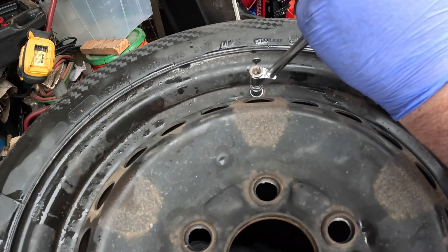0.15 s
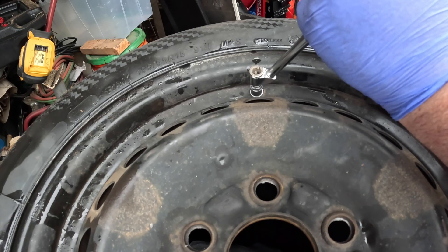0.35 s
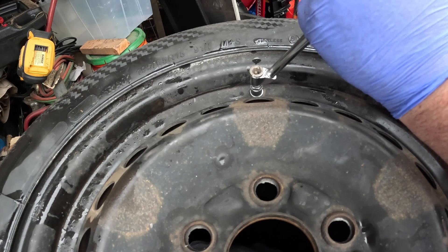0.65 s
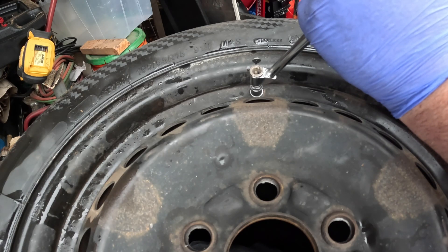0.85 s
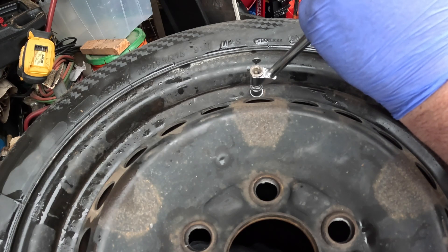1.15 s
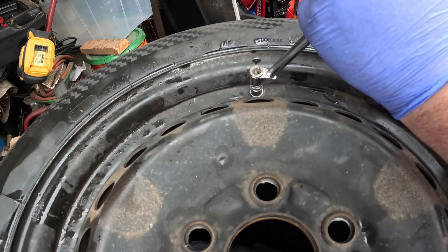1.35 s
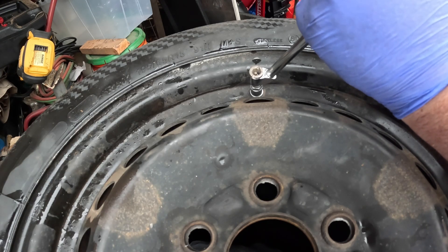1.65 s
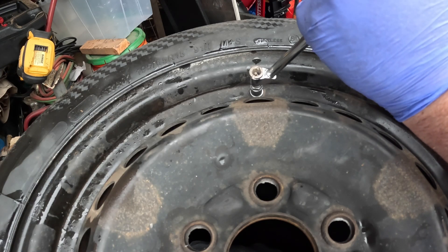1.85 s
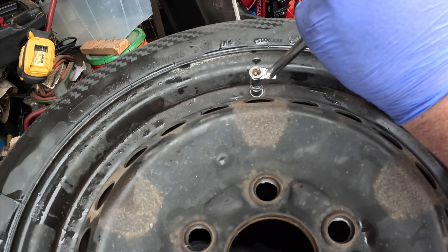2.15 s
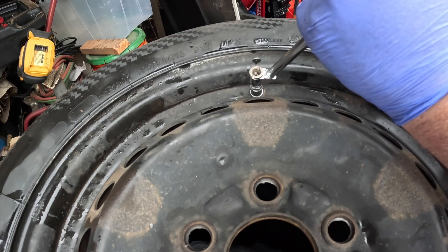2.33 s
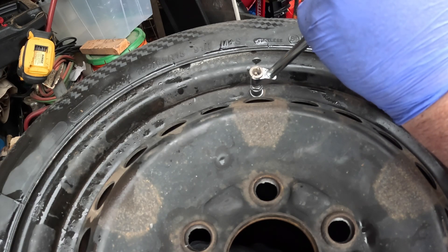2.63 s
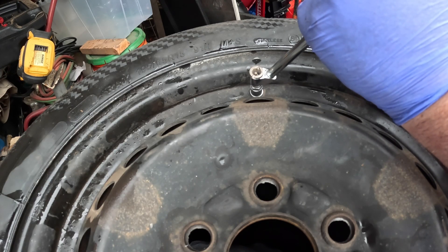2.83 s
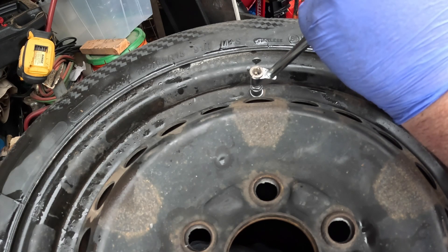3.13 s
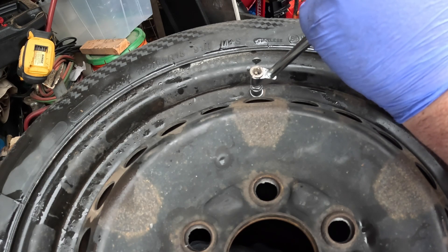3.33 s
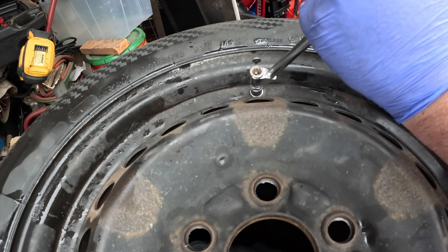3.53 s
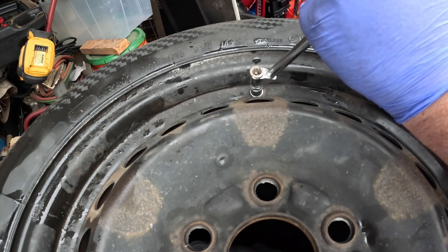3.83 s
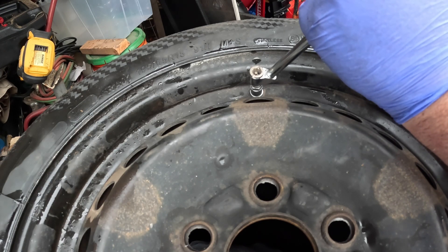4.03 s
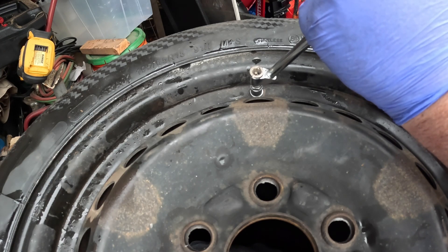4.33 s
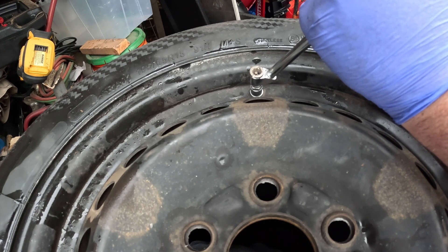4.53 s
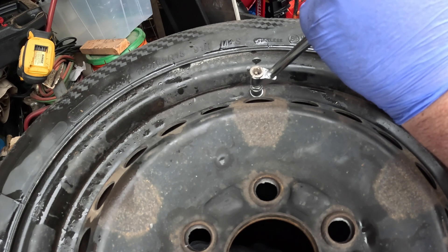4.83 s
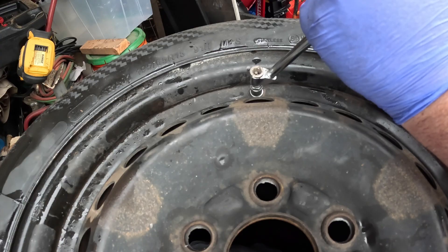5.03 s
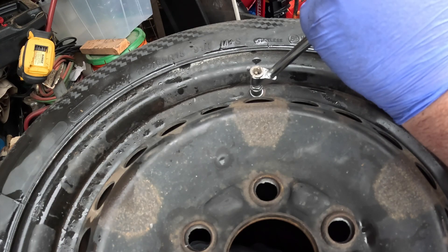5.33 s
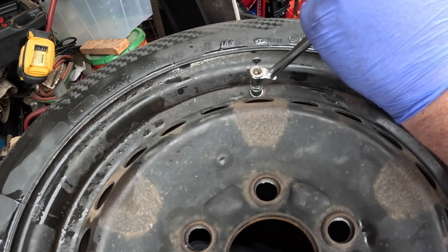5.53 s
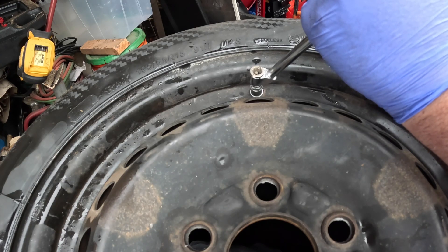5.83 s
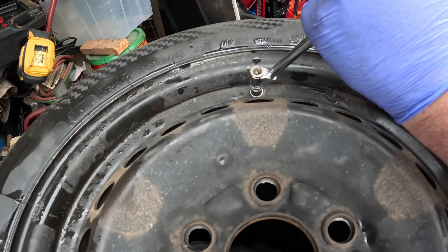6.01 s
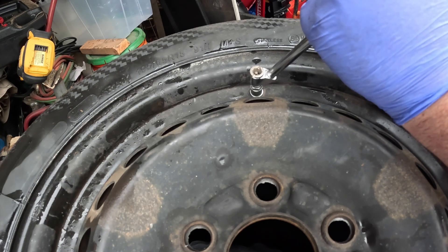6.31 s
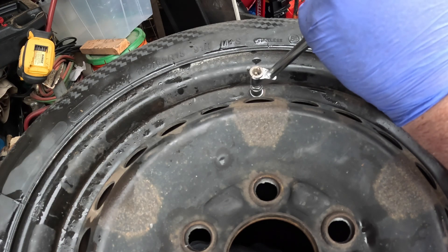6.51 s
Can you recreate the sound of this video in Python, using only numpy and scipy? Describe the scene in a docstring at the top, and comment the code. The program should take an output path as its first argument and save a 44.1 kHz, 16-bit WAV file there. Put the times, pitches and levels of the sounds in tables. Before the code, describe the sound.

Close by, an air chuck hisses into a car tire, then lets go with a tick. It is pressed on three more times, each with a sharp spit of air, a dull thump from the wheel and a short, ringing hiss. Small clicks, squeaks and thin whistles come in between. A last press slips straight off, leaving a fading whistle over the low rumble of a workshop.

```python
"""In a rumbling workshop, an air chuck (the hose's nozzle) is already hissing air into a car tyre.
After half a second it lets go with a tick; a little air seeps out and a thin leak whistles.
At about 1, 3 and 5 s it is pressed on again: air spits past the seal, the wheel thumps, and the flow
hisses through chuck and valve stem. Now and then the chuck ticks and leaks squeak or whistle.
At 6 s a last press slips straight off, leaving a fading whistle, a few faint leaks and the rumble."""
import sys
import numpy as np
from scipy import signal
from scipy.fft import rfft, irfft, next_fast_len
from scipy.io import wavfile

SR = 44100
rng = np.random.default_rng(int(sys.argv[2]) if len(sys.argv) > 2 else 0)


def generate_wav(signal):
    """Clip the signal to [-1, 1] and save it as 16-bit WAV at the path in sys.argv[1]."""
    frames = np.transpose(np.atleast_2d(signal))
    scaled = np.clip(frames, -1, 1) * 32767
    pcm = np.round(scaled).astype(np.int16)
    wavfile.write(sys.argv[1], SR, pcm)


N = 294147
SIZE = next_fast_len(N + SR // 10)
TIME = np.arange(N) / SR
FREQ = np.maximum(np.arange(SIZE // 2 + 1) * SR / SIZE, 1)


def undb(db):
    """Turns decibels into a number to multiply by."""
    return 10 ** (np.asarray(db) / 20)


def colour(points):
    """Gain at each frequency, joining up (Hz, dB) points."""
    hz, db = np.transpose(points)
    return undb(np.interp(np.log(FREQ), np.log(hz), db))


def resonance(hz, width):
    """Steep peak: gain 1 at the centre, half power at the edges."""
    return 1 / (1 + (np.sqrt(2) - 1) * (2 * (FREQ - hz) / width) ** 2)


def filtered(x, gain):
    """Sound passed through a gain at each frequency."""
    return irfft(rfft(x, SIZE) * gain, SIZE)[:N]


def noise(gain):
    """Noise of strength 1, shaped by a gain at each frequency."""
    x = irfft(gain * rng.standard_normal(2 * len(FREQ)).view(complex), SIZE)[:N]
    return x / x.std()


def wander(rate):
    """Random drift of typical size 1, up to about `rate` wiggles a second."""
    slow = FREQ[:len(FREQ) // 8]
    x = irfft(rng.standard_normal(2 * len(slow)).view(complex) / (1 + (slow / rate) ** 4))
    return np.interp(TIME, np.linspace(0, SIZE / SR, len(x)), x / x.std())


def hoarse(hz, width):
    """Narrow noise of strength 1 around a moving pitch."""
    strength = np.sqrt(2) * wander(width / 2)
    return strength * np.sin(2 * np.pi * np.cumsum(hz) / SR + np.pi * wander(width / 10))


def held(start, length, rise, fall):
    """Loudness curve that swells to 1, holds and dies away; times in seconds."""
    out = np.zeros(N)
    span = slice(*np.searchsorted(TIME, [start - 10 * rise, start + length + 20 * fall]))
    t = TIME[span] - start
    out[span] = np.exp(-(np.minimum(t, 0) / rise) ** 2 - np.maximum(t - length, 0) / fall)
    return out


def puff(at, rise, fall):
    """Loudness curve that swells to 1 and dies away at once."""
    return held(at, 0, rise, fall)


# tone of the room's noise: (frequency [Hz], level [dB])
ROOM_TONE = [(12, -55.5), (20, -18), (62, -0.5), (98, -2), (140, 0.5), (242, -3), (286, -1.5), (481, -13.5),
             (745, -13), (928, -19), (2110, -30.5), (5360, -51), (9030, -69.5), (12200, -61),
             (14000, -71.5)]
# low hums in the room: (pitch [Hz], width [Hz], level [dB])
DRONES = [(71, 9.9, -61), (164, 50, -60.5)]
# how the room swells and sinks: (time [s], rumble boost [dB], hiss boost [dB])
ROOM_SWELLS = [(0, -0.5, 15), (.8, 1.5, 1.5), (1.798, -0.7, 8.5), (3.1, 1.6, 2), (3.8, -0.5, 9),
               (4.45, 2, 5.5), (5.3, 1.5, 8.5), (5.8, 0.7, 7.5), (6.67, 0.7, 6)]

def workshop(level_db=-50, split_hz=1200):
    """The room rumbles, with two wavering hums and a faint hiss on top."""
    times, rumble_db, hiss_db = np.transpose(ROOM_SWELLS)
    air = undb(level_db) * noise(colour(ROOM_TONE))
    rumble = filtered(air, 1 / (1 + (FREQ / split_hz) ** 4))
    hiss = air - rumble
    drones = sum(noise(resonance(hz, width)) * undb(db - 0.5 * wander(1.2)) for hz, width, db in DRONES)
    low = (rumble + drones) * undb(np.interp(TIME, times, rumble_db) + wander(8))
    return low + hiss * undb(np.interp(TIME, times, hiss_db))


# spells with the valve open: (opens [s], starts to close [s], level [dB], level change [dB/s],
# brightness [dB], boost of the hollow low note [dB])
FILLS = [(-0.1, 0.484, -39, 2, -4.5, -1), (1.091, 2.413, -38, 0.5, -4.5, -2),
         (3.041, 4.193, -38.5, -0.24, -6, -2.5), (4.911, 5.373, -39, 2, -5.5, -0.5),
         (6.053, 6.134, -42.5, 14, -13.5, -6.5)]
# notes that ring inside chuck and stem: (pitch [Hz], width [Hz], level [dB])
AIR_PATH_NOTES = [(1038.5, 34, -1), (1064, 11.4, -0.06), (2120, 120, -10), (2608, 140, -6), (2785, 220, -9),
                  (3100, 31, -8), (3620, 340, -11.5), (4190, 150, -6), (4781, 110, -0.5), (5350, 77, -10.5),
                  (6476, 50, -4), (6900, 150, -13), (7060, 370, -6.5), (7476, 92, -2), (8090, 130, -11.5),
                  (8680, 100, -11), (9500, 120, -13.5), (10500, 190, -26.5), (12250, 120, -4.5)]
# broad hiss of the air jet under those notes: (frequency [Hz], level [dB])
JET_TONE = [(300, -39.5), (700, -31.5), (1500, -19.5), (1850, -22), (3300, -23), (4600, -14.5), (5900, -14),
            (7600, -12.5), (8800, -19.5), (9600, -13.5), (11200, -11), (12600, -9), (13600, -25.5),
            (14300, -63.5), (15200, -49)]

def filling(flutter_db=0.75, wander_db=0.4):
    """Swirling air hisses and makes chuck and stem ring while the valve is open."""
    flow, bright_db, hollow_db = 0, np.zeros(N), np.zeros(N)
    for opens, closes, db, db_per_s, tilt_db, boost_db in FILLS:
        open_s = np.clip(TIME - opens, 0, closes - opens)
        flow += held(opens, closes - opens, rise=0.013, fall=0.022) * undb(db + db_per_s * open_s)
        # the chuck sits differently each time
        bright_db[TIME > opens], hollow_db[TIME > opens] = tilt_db, boost_db
    ring_power = sum((undb(db) * resonance(hz, width)) ** 2 for hz, width, db in AIR_PATH_NOTES)
    gain = np.sqrt(colour(JET_TONE) ** 2 + ring_power)
    gain *= undb(-14 * resonance(8940, 170))  # a narrow dip in the hiss near 9 kHz
    # the hand is never still, so each of five bands wanders by itself
    band_of = np.searchsorted([1300, 3300, 5800, 8800], FREQ)
    air = 0
    for k, height in enumerate(np.linspace(-.5, .5, 5)):
        band = gain * (band_of == k)
        share = np.linalg.norm(band) / np.linalg.norm(gain)
        seating_db = height * bright_db + (k == 0) * hollow_db
        air += share * noise(band) * undb(seating_db + wander_db * wander(6.6))
    return flow * air * undb(flutter_db * wander(50))


# the chuck knocks on the stem: (time [s], level [dB], fade [s])
TICKS = [(0.52, -40, 0.0037), (0.531, -47, .003), (2.459, -49, 0.0043), (4.831, -58, .002),
         (5.402, -37, 0.0023), (5.99, -41, 0.002), (6.449, -63, .003)]
# tone of a tick: (frequency [Hz], level [dB])
TICK_TONE = [(500, -8), (1400, -4), (2500, 1.5), (3300, -5.5), (4300, -2), (6000, -14.5), (9000, -49),
             (14000, -52)]

def ticks(rise_s=0.00094):
    """Metal held in a hand gives short, dead clicks."""
    return noise(colour(TICK_TONE)) * sum(undb(db) * puff(at, rise_s, fade) for at, db, fade in TICKS)


# faint hisses in the pauses: (loudest at [s], swell and fade [s], level [dB])
SEEPS = [(0.921, 0.14, -84), (2.808, 0.1, -77.5)]

def seeping():
    """A trace of air escapes from the resting chuck."""
    hiss = noise(resonance(hz=4500, width=4600) ** 2)
    return hiss * sum(undb(db) * puff(at, swell, swell) for at, swell, db in SEEPS)


# thin, clear leaks: (start [s], length [s], pitch [Hz], pitch slide [Hz], level [dB])
WHISTLES = [(1.063, 0.011, 3580, -74, -54), (5.448, .012, 7370, 41, -63), (5.6, .01, 7410, -40, -69),
            (5.676, 0.029, 4880, -11.5, -55), (5.735, 0.043, 4840, -7, -59.5),
            (5.853, 0.032, 4810, -18.5, -53.5), (5.955, 0.028, 3540, 128.5, -45),
            (5.977, 0.16, 3514, -21.5, -47.5), (6.609, 0.037, 5100, -89, -71)]

def whistles(tremble_hz=32, flutter_db=2.5):
    """Air whistles on the edge of the seal's narrow gap; pitch and loudness tremble with the jet."""
    tremble, flutter = tremble_hz * wander(350), undb(flutter_db * wander(90))
    out = 0
    for at, length, hz, slide_hz, db in WHISTLES:
        pitch = hz + slide_hz * np.clip((TIME - at) / length, 0, 1) + tremble
        tone = np.sin(2 * np.pi * np.cumsum(pitch) / SR)
        out += tone * undb(db) * held(at, length, rise=0.0041, fall=0.012)
    return out * flutter


# the chuck pushes the valve pin in, for spitting() and thumps(): (time [s], spit [dB], squeal [dB],
# squeal fade [s], thump [dB], pitch above which the thump weakens [Hz])
PRESSES = [(1.09, -29.5, -28.5, 0.0091, -32, 600), (3.031, -28, -31.5, 0.0037, -23, 380),
           (4.907, -28, -36.5, 0.0072, -28, 455), (6.050, -26, -25.5, 0.0091, -24, 400)]
# the chuck tilts and air sputters out: (start [s], length [s], level [dB])
SLIPS = [(1.181, 0.051, -37.5), (1.25, 0.042, -49.5), (5.371, .002, -45), (6.071, 0.01, -28),
         (6.091, 0.044, -43.5)]
# tone of the spitting air: (frequency [Hz], level [dB])
SPIT_TONE = [(400, -17.5), (1700, -9), (2700, 0.5), (3500, -4), (4300, -2), (5200, -0.5), (6200, -3.5),
             (7800, 4), (9000, -12), (10500, 1.5), (12200, -0.5), (13300, -9), (15000, -37.5)]

def spitting(squeal_hz=6830, drop_hz=900, slip_squeal_db=1.5, sputter_db=2.4, rough_db=1.1):
    """Air spits, then squeals, until the seal sits tight; a tilted chuck does both at once."""
    spit, squeal, pitch = 0, 0, squeal_hz
    for at, spit_db, squeal_db, fade, _, _ in PRESSES:
        spit += undb(spit_db) * puff(at, rise=0.003, fall=0.012)
        squeal += undb(squeal_db) * puff(at + 0.019, rise=0.012, fall=fade)
        pitch += drop_hz * puff(at, rise=0.003, fall=0.026)  # starts high, drops as the gap narrows
    slip = sum(undb(db) * held(at, length, rise=0.005, fall=0.011) for at, length, db in SLIPS)
    slip *= undb(sputter_db * wander(60))
    spits = (spit + slip) * noise(colour(SPIT_TONE))
    squeals = (squeal + undb(slip_squeal_db) * slip) * hoarse(pitch, width=1000)
    return (spits + squeals) * undb(rough_db * wander(300))


# the wheel's own notes: (pitch [Hz], time to fade by 60 dB [s], level [dB])
WHEEL_NOTES = [(250, 0.031, 3), (297, 0.12, -12.5), (351, 0.035, -4.5), (430, 0.0067, -5)]

def thumps(push_s=0.0023):
    """Each press kicks the wheel into a brief, dull ring; how far up its notes reach differs from press to
    press."""
    out = 0
    for at, _, _, _, thump_db, reach_hz in PRESSES:
        t = np.maximum(TIME - at, 0)
        swell = 1 - np.exp(-t / push_s)
        for hz, ring_s, note_db in WHEEL_NOTES:
            ring = np.sin(2 * np.pi * hz * t) * np.exp(-np.log(1000) * t / ring_s)
            out += undb(thump_db + note_db) * swell * ring / np.hypot(1, (hz / reach_hz) ** 2)
    return out


# weak, hoarse leaks: (loudest at [s], swell [s], level [dB], pitch [Hz], width [Hz],
# slide to either side of that pitch [Hz])
SQUEAKS = [(1.809, .030, -44, 3570, 141, -29), (1.910, .025, -45.5, 3560, 142, -51),
           (5.426, .012, -52.5, 3640, 360, -150), (5.576, .012, -55, 3620, 360, -170),
           (5.795, .010, -56, 2710, 380, -120), (6.236, .011, -53.5, 5520, 850, 0),
           (6.631, .009, -62, 3660, 240, 222)]

def squeaks(slide_s=0.0068, fade_s=0.016):
    """Too little air for a clean whistle makes the gap squeak; the pitch slides and settles."""
    out = 0
    for at, swell, db, hz, width, slide_hz in SQUEAKS:
        pitch = hz + slide_hz * np.tanh((TIME - at) / slide_s)
        out += undb(db) * puff(at, swell, fade_s) * hoarse(pitch, width)
    return out


def echoes(x, fade_s):
    """A blur of reflections, as strong as x, that fades by 60 dB in fade_s."""
    response = rng.standard_normal(SR) * np.exp(-np.log(1000) * TIME[:SR] / fade_s)
    return signal.fftconvolve(x, response / np.linalg.norm(response))[:N]


# how much left and right differ: (frequency [Hz], side level relative to the middle [dB])
STEREO_WIDTH = [(20, -38.5), (700, -42), (2500, -60), (11100, -64), (11450, -4.5), (12050, -3), (12450, -6),
                (14000, 11)]

def stereo(mid, right_lean=0.2):
    """Two microphone openings sit so close that only the top treble differs, louder on the right."""
    shift = np.pi * wander(25)  # their rim scatters short waves along shifting paths
    rim = echoes(mid, fade_s=0.06) * np.cos(shift) + echoes(mid, fade_s=0.06) * np.sin(shift)
    side = filtered(rim - right_lean * mid, colour(STEREO_WIDTH))
    return np.array([mid + side, mid - side])


def scene(room_db=-19, linger_db=-11):
    """Chuck and wheel at arm's length in a workshop."""
    near = filling() + spitting() + thumps() + ticks() + seeping()
    leaks = whistles() + squeaks()
    # the broad hiss dies away quickly; whistles and squeaks ring on longer
    room = undb(room_db) * echoes(near, fade_s=0.073) + undb(linger_db) * echoes(leaks, fade_s=0.51)
    return stereo(near + leaks + room + workshop())


def record(dry, top_hz=15000):
    """Cuts off the very highest treble."""
    return signal.sosfilt(signal.ellip(8, .2, 70, top_hz, fs=SR, output="sos"), dry)


dry = scene()
out = record(dry)
generate_wav(out)
```